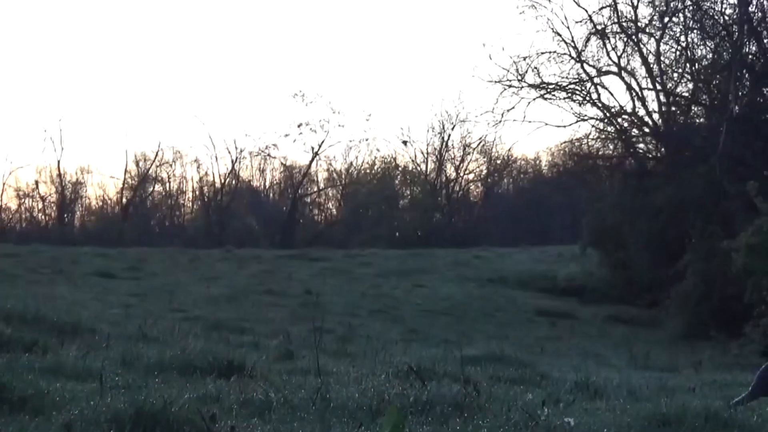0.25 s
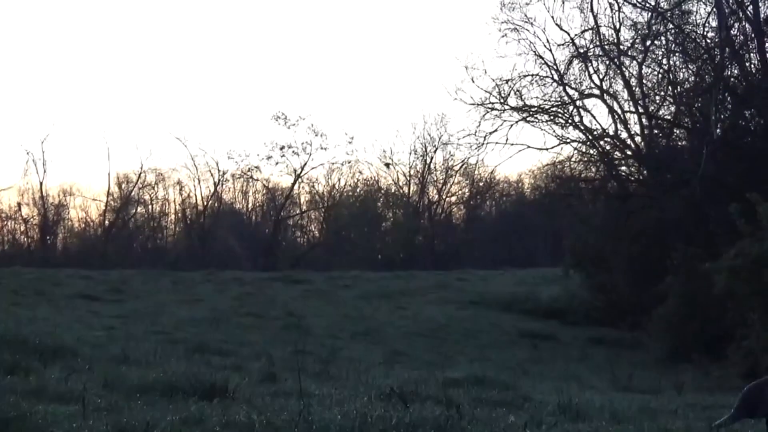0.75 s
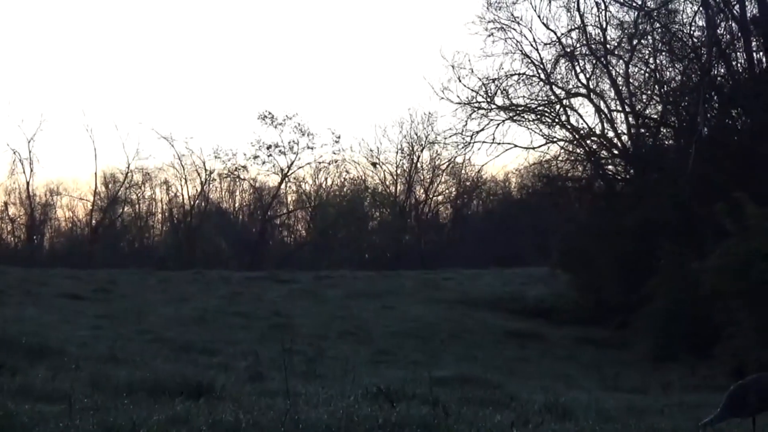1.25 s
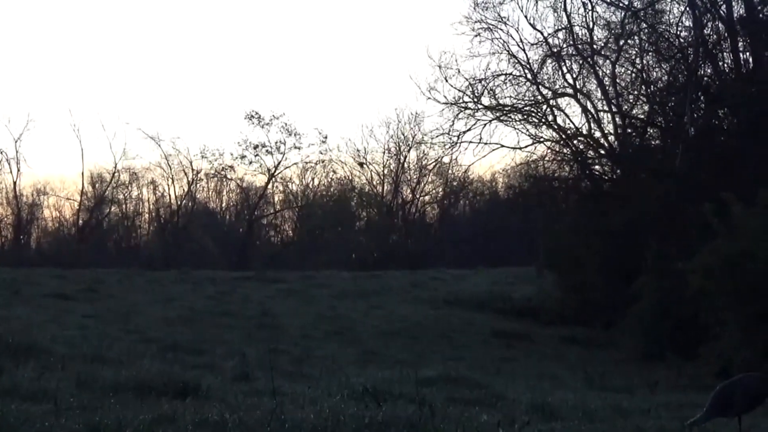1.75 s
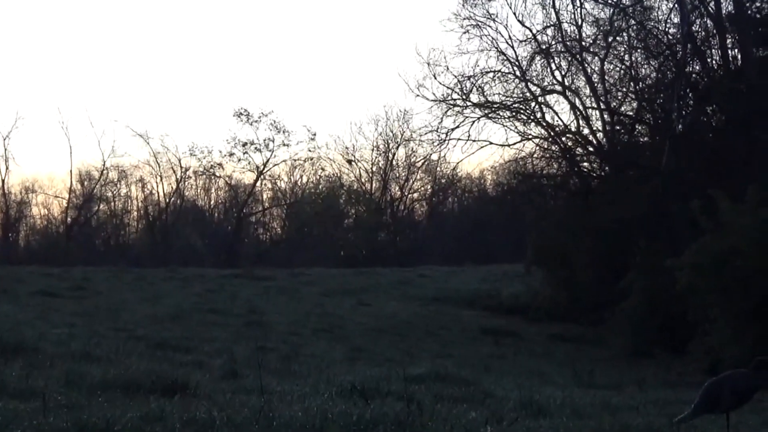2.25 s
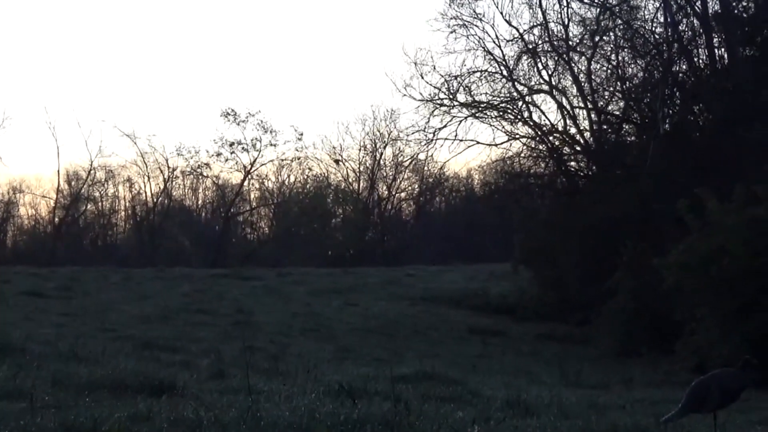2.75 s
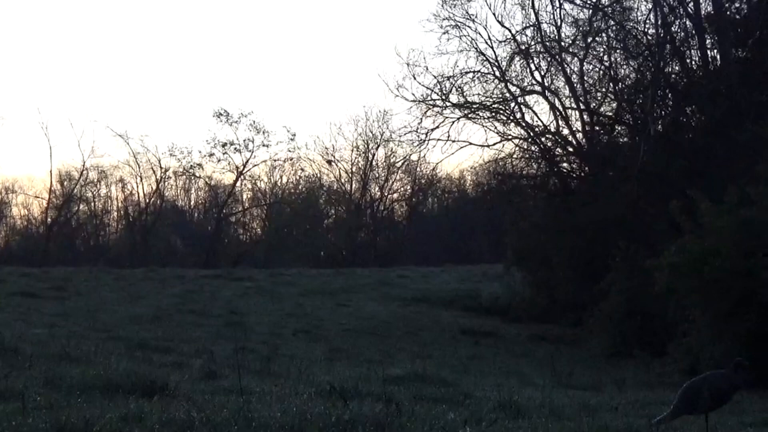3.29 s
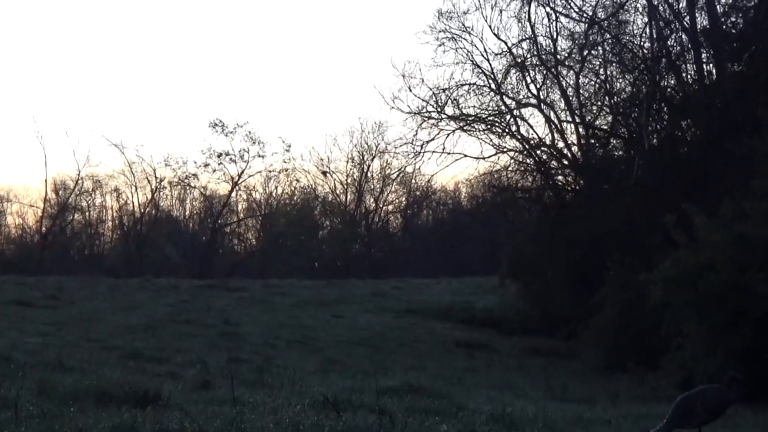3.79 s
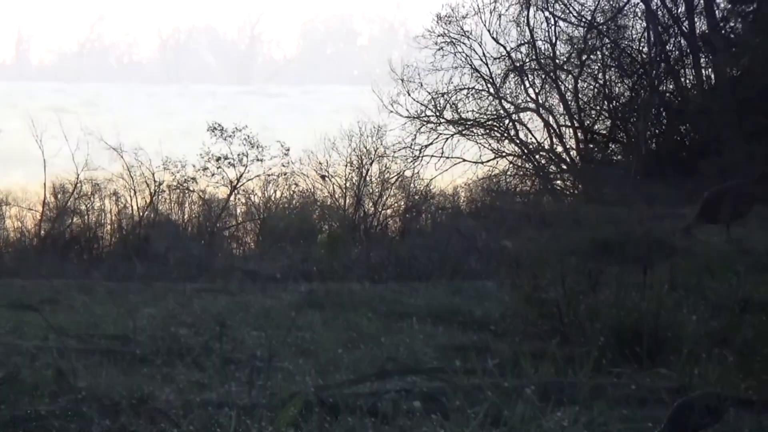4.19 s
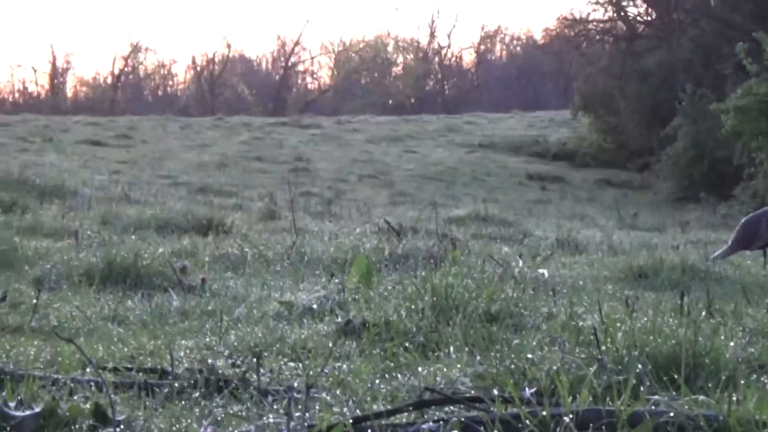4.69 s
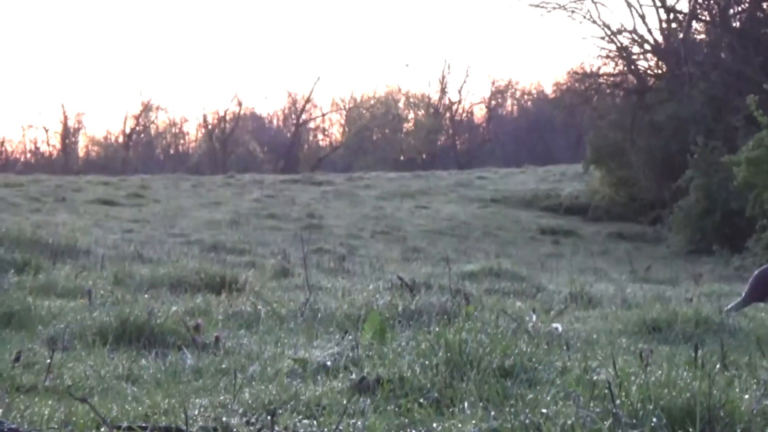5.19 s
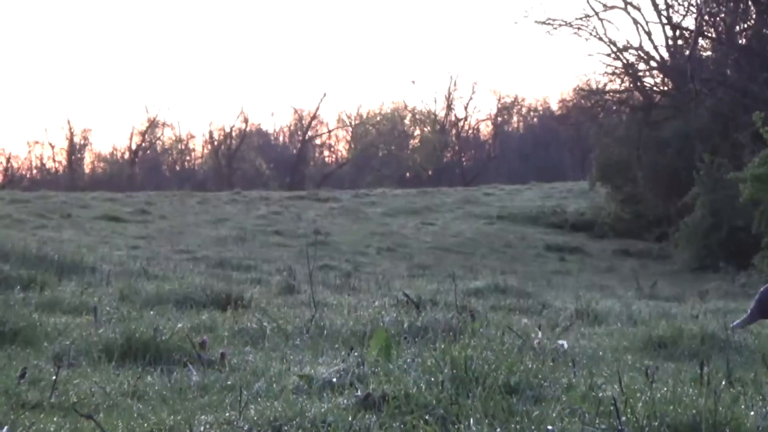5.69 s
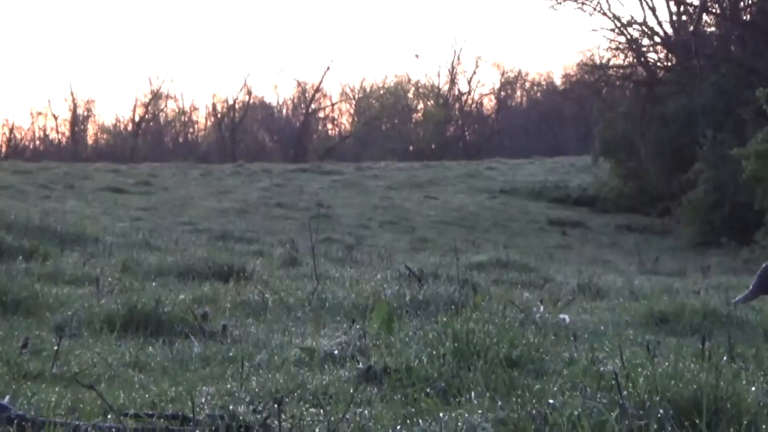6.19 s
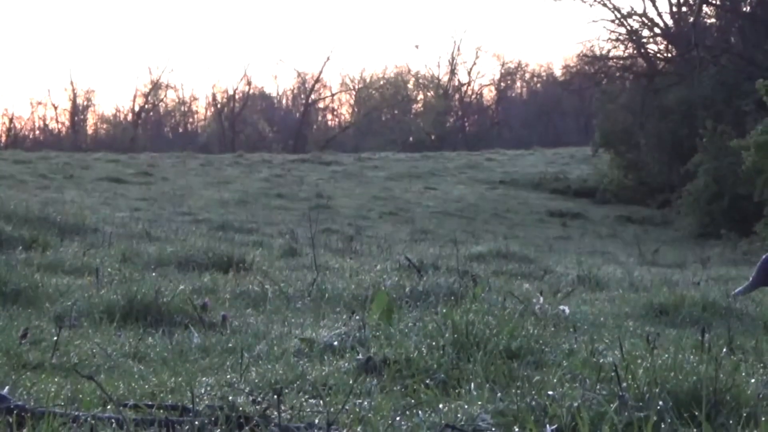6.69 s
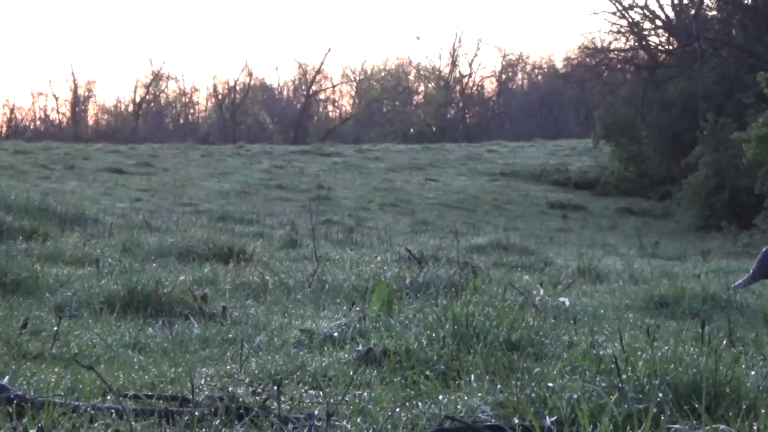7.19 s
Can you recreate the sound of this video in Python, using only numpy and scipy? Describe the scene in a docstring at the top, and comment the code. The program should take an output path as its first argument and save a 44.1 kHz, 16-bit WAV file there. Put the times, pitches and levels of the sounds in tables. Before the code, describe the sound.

Dawn at a pasture's edge: soft distant air, light hiss and a faint far chorus. Nearby songbirds begin with warbled, sliding whistles, and a quick high trill runs from about 0.45 to 0.9 s. Two hard, dry knocks on the camera body jump out at 0.37 and 0.7 s, with a tick at 1.25. At 1.7 s a turkey gobbles far across the field, hoarse falling yelps breaking into a throaty rattle of about half a second, echoing off trees. Whistles continue, with small ticks between 3.2 and 3.8 s and a sharp chip at 3.6. The loudest, crackiest knock hits at 3.9 s. A shorter, weaker gobble follows at 4.4 s with a thin high seep, then another chip at 4.8. A faint low hum lingers. Clearer bird slurs sound from 6 s alongside a soft rustle at 6.2, and a brighter trill closes from 7 s.

```python
"""Gobbles at the edge of a pasture

At dawn a wild turkey gobbles twice from far off: rough tones, then buzzing pulses through throat resonances.
Songbirds whistle, trill and chip on gliding near-pure tones, scattered and echoed by the trees. Three knocks
ring the modes of a hand-held camera's body; light ticks and rustles are bursts of filtered noise. Distant air,
a faint low hum, a far chorus and microphone hiss lie underneath."""
import sys
import numpy as np
from scipy import signal
from scipy.fft import rfft, irfft, next_fast_len
from scipy.io import wavfile
from scipy.ndimage import map_coordinates

SR = 44100
rng = np.random.default_rng(int(sys.argv[2]) if len(sys.argv) > 2 else 0)


def transcribe(signal):
    """Save signal, clipped to [-1, 1], as a 16-bit WAV file at the path in sys.argv[1]."""
    frames = np.atleast_2d(signal).T
    limited = np.clip(frames, -1, 1)
    pcm = np.round(limited * 32767).astype(np.int16)
    wavfile.write(sys.argv[1], SR, pcm)


N = 328545
T = np.arange(N) / SR  # s
LEFT_RIGHT = np.array([[1], [-1]])  # signs that spread a side signal over the two channels


def undb(db):
    """Decibels to gain."""
    return 10 ** (np.asarray(db) / 20)


def unit(x):
    """Scale to rms 1."""
    return x / np.sqrt(np.mean(x ** 2))


def decay(t, t60_s):
    """Exponential fade that loses 60 dB in t60_s."""
    return np.exp(-np.log(1000) * t / t60_s)


def panned(x, pan_db):
    """Place a sound between left and right; pan_db is left minus right."""
    return undb(pan_db * LEFT_RIGHT / 2) * x


def add(out, start_s, x):
    """Mix x into out from start_s on."""
    i = max(int(start_s * SR), 0)
    out[..., i:i + x.shape[-1]] += x[..., :max(N - i, 0)]


def band(x, hz, width_hz):
    """One resonance, gain 1 at its centre."""
    return signal.lfilter(*signal.iirpeak(min(hz, SR * .45), hz / width_hz, fs=SR), x)


def band_twice(x, hz, width_hz):
    """The same resonance in series with itself, for steeper skirts."""
    return band(band(x, hz, width_hz), hz, width_hz)


def walk(rate_hz, size=N):
    """Smooth chance with a spread near 1: random knots at rate_hz, joined by straight lines."""
    knots = rng.standard_normal(int(size / SR * rate_hz) + 4)
    return map_coordinates(knots, [1 + np.arange(size) * rate_hz / SR], order=1) * 1.2


def noise(spectrum):
    """Noise of rms 1 shaped by a spectrum of (pitch_hz, level_db) points."""
    hz, db = np.transpose(spectrum)
    size = next_fast_len(N)
    log_hz = np.log(np.fft.rfftfreq(size, 1 / SR) + 1)
    gain = undb(np.interp(log_hz, np.log(hz), db, left=-120, right=-120))
    return unit(irfft(rfft(rng.standard_normal(size)) * gain, size)[:N])


def arch(length_s):
    """Progress 0-1 through a note, and its rounded loudness."""
    progress = np.linspace(0, 1, max(int(length_s * SR), 32))
    return progress, np.abs(np.sin(np.pi * progress)) ** 0.51


def bend(length_s, start_hz, middle_hz, end_hz):
    """A pitch contour that curves through three pitches."""
    curve = np.polyfit([0, .5, 1], [start_hz, middle_hz, end_hz], 2)
    return np.polyval(curve, arch(length_s)[0])


def glide(length_s, start_hz, end_hz, settle):
    """A pitch contour that moves fast at first and levels off over `settle` time constants."""
    moved = np.expm1(-settle * arch(length_s)[0]) / np.expm1(-settle)
    return start_hz + (end_hz - start_hz) * moved


def tone(hz, waver, flutter_db):
    """A nearly pure note on a pitch contour, wavering in pitch and level."""
    swell = np.sin(np.linspace(0, np.pi, len(hz))).clip(0) ** 0.38
    phase = 2 * np.pi * np.cumsum(hz * (1 + waver * walk(254, len(hz)))) / SR
    wave = np.sin(phase) + undb(-30) * np.sin(2 * phase)  # a trace of second harmonic
    return np.sqrt(2) * swell * undb(flutter_db * walk(119.6, len(hz))) * wave


def whistle(length_s, start_hz, middle_hz, end_hz, waver=0.0048, flutter_db=4.0):
    """A nearly pure tone that bends through three pitches."""
    return tone(bend(length_s, start_hz, middle_hz, end_hz), waver, flutter_db)


def woods(x, direct_db, early_db, late_db, early_t60_s=0.22, late_t60_s=0.62, spread=0.52):
    """Near trunks scatter a short smear; the tree line returns a long soft tail."""
    t = T[:SR]
    early = decay(t, early_t60_s) * (t > .003)
    late = decay(t, late_t60_s) * (1 - np.exp(-t / 0.0063))
    smear = undb(early_db) * unit(early) * rng.standard_normal((2, SR))
    tail = undb(late_db) * unit(late) * rng.standard_normal((2, SR))
    mid, side = (smear + tail) / np.sqrt(SR)
    echo = (mid + spread * LEFT_RIGHT * side) / np.hypot(1, spread)
    return undb(direct_db) * x + signal.fftconvolve(x, echo, axes=1)[:, :N]


def throat(source):
    """The turkey's throat resonances, each applied twice for dark valleys; rms 1."""
    # resonances: pitch_hz, width_hz of one pass, relative level_db
    resonances = [(565, 55, 8.5), (1096, 80, 0), (1325, 105, 2.5), (1680, 470, -1), (2180, 250, -1)]
    return unit(sum(undb(db) * band_twice(source, hz, width_hz) for hz, width_hz, db in resonances))


def yelp(length_s, pitch_hz, rough=0.044, rasp_db=-11):
    """One hoarse note, slightly falling, with throat-coloured breath; rms 1 before its swell."""
    progress, swell = arch(length_s)
    size = len(progress)
    fall = 0.05 * (.5 - progress)
    phase = 2 * np.pi * np.cumsum(pitch_hz * (1 + fall + rough * walk(700, size))) / SR
    # the membrane also flaps at a third of the main pitch, which adds sidebands and chops the rush of air
    flap = np.sin(phase / 3)
    rasp = throat(np.diff(rng.standard_normal(size) * (1 + flap), prepend=0))
    voice = np.sin(phase) * (1 + 0.23 * flap) + undb(rasp_db) * rasp
    return unit(voice * undb(3.2 * walk(344, size))) * swell


def rattle(length_s, beat_hz=19, buzz_hz=340):
    """Buzz and breath, chopped into uneven beats and rung through the throat."""
    progress, swell = arch(length_s)
    size = len(progress)
    cycles = np.cumsum(buzz_hz * (1 + 0.0633 * walk(150, size))) / SR
    clicks = np.diff(np.floor(cycles), prepend=0)  # one per buzz cycle
    source = unit(clicks) + .5 * rng.standard_normal(size)
    beats = np.sin(np.pi * np.cumsum(beat_hz * (1 + 0.13 * walk(15.6, size))) / SR) ** 4
    return throat(source * beats) * np.sqrt(swell)


def turkey():
    """Hoarse falling yelps, then a rattle of buzzing pulses through the throat, far across the field."""
    # gobbles: start_s, yelp level_db, rattle delay_s, rattle length_s, rattle level_db
    gobbles = [(1.67, -36, .092, .55, -52.5), (4.356, -45, .146, 0.34, -52)]
    # the notes of one gobble: delay_s, length_s, main pitch_hz, level_db relative to the gobble's yelp level
    gobble_notes = [(0, 0.063, 1687, -2), (0.047, 0.023, 1378, 1.5), (0.066, 0.023, 1045, -5),
                    (0.085, .036, 2185, -6), (.138, .026, 1050, -8), (.205, 0.035, 1065, -8),
                    (.422, 0.044, 1025, -8.5)]
    out = np.zeros(N)
    for start_s, yelp_db, rattle_delay_s, rattle_length_s, rattle_db in gobbles:
        for delay_s, length_s, hz, db in gobble_notes:
            add(out, start_s + delay_s, yelp(length_s, hz) * undb(yelp_db + db))
        add(out, start_s + rattle_delay_s, rattle(rattle_length_s) * undb(rattle_db))
    return woods(panned(out, -2), direct_db=-2.0, early_db=-8.5, late_db=-13.5, late_t60_s=2.1)


def songbirds(near_db=-27, far_db=-46.5):
    """Carolled whistles from several perches; the loud ones come from close by and carry less echo."""
    near, far = np.zeros((2, 2, N))
    for start_s, hz, db, growth_db, pan_db in bird_notes():
        # 0 at near_db or louder, 1 at far_db or fainter
        distance = np.clip((near_db - db) / (near_db - far_db), 0, 1)
        # far notes arrive through more branches, so they flutter more
        note = tone(hz, waver=.004 + .007 * distance ** 4, flutter_db=2 + 1.4 * distance)
        growth = growth_db * np.linspace(-.5, .5, len(hz))
        note = panned(note * undb(db + growth), pan_db)
        add(near, start_s, (1 - distance) * note)
        add(far, start_s, distance * note)
    near = woods(near, direct_db=-.5, early_db=-11, late_db=-14, early_t60_s=.16)
    far = woods(far, direct_db=-1.2, early_db=-7.5, late_db=-8, early_t60_s=.16, late_t60_s=.8)
    return near + far


def bird_notes():
    """Every sung note as (start_s, pitch contour in Hz, level_db, growth_db, pan_db)."""
    # a warbled phrase: delay_s, length_s, start_hz, middle_hz, end_hz, level_db relative to the phrase
    warble = [(0, .036, 2590, 2630, 2660, -2.5), (.031, .03, 3090, 3090, 3020, -9.5),
              (.062, .07, 2370, 2270, 2300, -7), (.153, 0.047, 2230, 2470, 2720, -1)]
    # level_db of each phrase
    warble_levels = [-53, -43, -41.5, -44]
    for k, phrase_db in enumerate(warble_levels):
        for delay_s, length_s, start_hz, middle_hz, end_hz, db in warble:
            start_s = -.091 + k * .405 + delay_s  # a phrase every .405 s
            if start_s > 0:
                yield start_s, bend(length_s, start_hz, middle_hz, end_hz), phrase_db + db, 0, -9
    # falling slurs, steep at first, growing louder: start_s, length_s, start_hz, end_hz, level_db, pan_db
    slurs = [(0.502, .06, 2160, 1824, -50, -6), (0.757, 0.044, 3750, 3450, -53, -2),
             (0.844, 0.042, 2920, 2480, -45, -8), (.932, 0.061, 2130, 1945, -44, -5),
             (1.312, 0.082, 3890, 3360, -50, -5), (1.518, 0.064, 2134, 1970, -44.5, -4),
             (1.855, 0.083, 3600, 2820, -47.5, -7), (2.111, 0.031, 3020, 2853, -43, -6),
             (2.52, 0.11, 3325, 2186, -49, -4), (2.937, 0.078, 2850, 2380, -49.5, -5),
             (3.118, 0.081, 3780, 3070, -47, -6), (3.223, .045, 2790, 2340, -48, -2),
             (3.348, 0.12, 3440, 2330, -53, 5), (4.2, 0.043, 3045, 2933, -45.5, -4),
             (4.49, .07, 3400, 2910, -52, 7), (4.71, 0.058, 3300, 3150, -54.5, 4),
             (5.44, 0.038, 3200, 2750, -51, -8), (5.481, 0.048, 3260, 2700, -47, -3),
             (6.004, 0.083, 2600, 1754, -39.5, -8.5), (6.067, 0.048, 3130, 2740, -47.5, -5),
             (6.133, 0.05, 3370, 2730, -47.5, -11), (6.403, .148, 3320, 2740, -39.5, -10.5),
             (6.584, 0.039, 3430, 2870, -51, -2), (6.655, 0.091, 2740, 1682, -42.5, -8.5),
             (7.223, 0.051, 2446, 2060, -56, -5)]
    for start_s, length_s, start_hz, end_hz, db, pan_db in slurs:
        yield start_s, glide(length_s, start_hz, end_hz, settle=2.1), db, 5.5, pan_db
    # rising slurs: start_s, length_s, start_hz, end_hz, level_db
    rises = [(1.399, 0.063, 2300, 3080, -43), (3.195, .055, 2450, 3150, -46),
             (6.027, 0.0426, 2580, 2930, -47.5)]
    for start_s, length_s, start_hz, end_hz, db in rises:
        yield start_s, np.geomspace(start_hz, end_hz, int(length_s * SR)), db, 0, -6
    # notes that rise to a top and drop back: start_s, length_s, top_hz, level_db
    arches = [(1.39, 0.047, 3000, -47), (1.527, .07, 3234, -43.5), (1.928, 0.054, 3010, -44),
              (1.993, 0.04, 3165, -42.5), (2.702, .13, 1860, -49.5), (3.443, .097, 1846, -45.5),
              (6.544, 0.058, 3240, -50), (6.719, 0.046, 2500, -44.5), (7.164, .08, 2526, -44),
              (7.285, .06, 2536, -49)]
    for start_s, length_s, top_hz, db in arches:
        yield start_s, bend(length_s, top_hz * .85, top_hz, top_hz * .92), db, 0, -6.5
    # level whistles: start_s, length_s, pitch_hz, level_db
    held = [(2.569, 0.11, 2230, -51.5), (3.457, 0.13, 3540, -55), (6.223, 0.133, 2326, -46),
            (6.75, .1, 4380, -60)]
    for start_s, length_s, hz, db in held:
        yield start_s, bend(length_s, hz, hz, hz), db, 0, -4.5
    # upsweeps that end on a softer held top: start_s, level_db, pan_db
    upsweeps = [(2.069, -43, -4.5), (6.655, -46.5, 4)]
    # pitches of one upsweep: start_hz, middle_hz, end_hz
    upsweep_pitches = (3330, 3643, 4100)
    sweep_s, top_hz, top_db = .095, 4065, -11  # top_db is relative to the sweep
    for start_s, db, pan_db in upsweeps:
        sweep = bend(sweep_s, *upsweep_pitches)
        yield start_s, sweep, db, 0, pan_db
        yield start_s + .9 * sweep_s, np.full(len(sweep), top_hz), db + top_db, 0, pan_db


def trill(count=5, period_s=.095, slur_lead_s=.026, rise_s=.07, rise_from_hz=3600, top_hz=4863):
    """Each syllable slurs down, then sweeps up and swells into a held top."""
    # bouts: start_s, held top level_db, slur level_db
    bouts = [(.447, -56, -64), (7.047, -50.5, -53)]
    out = np.zeros((2, N))
    for bout_s, top_db, slur_db in bouts:
        for start_s in bout_s + period_s * np.arange(count):
            slur = whistle(0.035, 3900, 3300, 2948, waver=0.014)
            add(out, start_s - slur_lead_s, slur * undb(slur_db))
            hz = glide(rise_s, rise_from_hz, top_hz, settle=8.5)
            # the level reaches that of the top only as the pitch does
            arrived = ((hz - rise_from_hz) / (top_hz - rise_from_hz)) ** 8
            level_db = slur_db + (top_db - slur_db) * arrived
            add(out, start_s, tone(hz, waver=.002, flutter_db=2) * undb(level_db))
    return woods(out, direct_db=0, early_db=-11, late_db=-11)


def seeps():
    """Thin high wavering calls of a small bird."""
    # calls: start_s, length_s, start_hz, middle_hz, end_hz, level_db before the woods
    seep_calls = [(4.376, 0.15, 7850, 7630, 8040, -59.5), (4.65, 0.037, 6200, 6440, 6650, -56.5)]
    out = np.zeros((2, N))
    for start_s, length_s, start_hz, middle_hz, end_hz, db in seep_calls:
        add(out, start_s, whistle(length_s, start_hz, middle_hz, end_hz, waver=0.0114) * undb(db))
    return woods(out, direct_db=-1.5, early_db=-7, late_db=-13)


def chips(length_s=.022, waver=.05):
    """Sharp calls: very fast downward sweeps, smeared by the branches."""
    # calls: start_s, level_db before the woods
    chip_calls = [(3.568, -37.5), (4.819, -37.5)]
    out = np.zeros((2, N))
    for start_s, db in chip_calls:
        chip = whistle(length_s, 10500, 6900, 5250, waver=waver)
        add(out, start_s, panned(chip * undb(db), -1.5))
    return woods(out, direct_db=-6, early_db=-1.5, late_db=-14, early_t60_s=0.13)


def knocks(rise_s=0.0015, crack_t60_s=0.013, crack_width=0.61, port_skew=0.65, panel_hz=770):
    """Each knock rings the camera body for a few milliseconds, with a brief crack on top."""
    # blows: start_s, level_db, tilt_db per octave, lowest_hz (modes below it are weak),
    # panel_db (side panel's boost or cut), grip (pitch factor), relative crack_db
    blows = [(0.3651, -3, 1, 345, -14, 1.017, -13), (0.7117, -5, 2.6, 131.3, -0.5, 0.98, -8),
             (3.9198, 0, 3, 141, -5, 1, -3.5)]
    # body modes: pitch_hz before the grip factor, t60_s, relative level_db, pan_db
    body_modes = [(176, 0.078, -23.5, 0), (258.3, 0.036, -19.5, 8.5), (428.6, 0.028, -13.5, 8.5),
                  (705, 0.03, -9.5, -5), (837, 0.024, -4.5, -10), (1096, 0.021, -8, 0),
                  (1399, 0.023, -7.5, 0.5), (1743, 0.013, 2.5, -4), (2170, 0.026, -11.5, 2),
                  (2410, 0.02, -11, 1), (2810, 0.015, -13, 7), (3250, 0.0088, -12, 0),
                  (3580, 0.019, -16.5, -2), (4380, 0.0069, -7.5, 0), (5095, 0.014, -25, -3),
                  (6000, 0.0077, -15, -5), (7050, 0.0064, -28, 11), (7400, 0.0056, -36, 3)]
    out, t = np.zeros((2, N)), T[:SR // 8]
    build = 1 - np.exp(-t / rise_s)
    for start_s, db, tilt_db, lowest_hz, panel_db, grip, crack_db in blows:
        ring = 0
        for k, (hz, t60_s, mode_db, pan_db) in enumerate(body_modes):
            # hardness tilts the modes; the place of the blow decides how much the side panel rings
            panel_share = np.exp(-(np.log2(hz / panel_hz) / 0.21) ** 2)
            blow_db = tilt_db * np.log2(hz / 1500) + panel_db * panel_share
            gain = undb(mode_db + blow_db) / np.hypot(1, (lowest_hz / hz) ** 4)
            # each mode reaches the two capsules a little out of step
            skew = port_skew * LEFT_RIGHT * np.cos(k)
            wave = np.sin(2 * np.pi * hz * grip * t + k * np.pi + skew)
            ring = ring + panned(gain * wave * decay(t, t60_s), pan_db)
        mid, side = band_twice(rng.standard_normal((2, len(t))), 3200, 3200)
        crack = unit(mid + crack_width * LEFT_RIGHT * side) * decay(t, crack_t60_s)
        add(out, start_s, undb(db) * build * (ring + undb(crack_db) * crack))
    return woods(out, direct_db=1.5, early_db=-36, late_db=-29.5)


def ticks(bright_t60_s=0.0075, dull_t60_s=0.012):
    """Tiny dry ticks of bright decaying noise, some with a little duller body under them."""
    # ticks: start_s, level_db before halving, body_db relative to the bright snap
    tick_times = [(0.2452, -33, -18), (1.252, -25, -14), (2.307, -32, -36), (3.1597, -28, -18),
                  (3.272, -37, -12), (3.465, -24, -24), (3.552, -36, -18), (3.7518, -33, -28),
                  (3.837, -28.5, 6), (4.129, -35.5, 4.5), (4.488, -42.5, 12), (5.2067, -31, -5),
                  (6.412, -34, -2)]
    out, t = np.zeros(N), T[:SR // 30]
    for start_s, db, body_db in tick_times:
        snap, body = rng.standard_normal((2, len(t)))
        snap = unit(band_twice(snap, 7700, 5000)) * decay(t, bright_t60_s)
        body = unit(band_twice(body, 1100, 1100)) * decay(t, dull_t60_s)
        add(out, start_s, undb(db) * (snap + undb(body_db) * body) / 2)
    return out


def rustles():
    """Short grainy brushes and soft bumps close to the microphone, made of band-filtered noise."""
    # brushes and bumps: start_s, length_s, centre_hz, width_hz of one filter pass, level_db
    brushes = [(1.57, 0.015, 322, 280, -54.5), (1.79, 0.061, 170, 120, -61), (5.114, 0.12, 4120, 3240, -51),
               (6.117, 0.21, 404, 250, -60), (6.19, 0.156, 1300, 1900, -49.5),
               (6.214, 0.15, 7450, 6000, -53.5), (7.054, 0.016, 375, 237.6, -45)]
    out = np.zeros(N)
    for start_s, length_s, hz, width_hz, db in brushes:
        progress, swell = arch(length_s)
        grains = rng.standard_normal(len(progress)) * undb(3 * walk(297, len(progress)))
        add(out, start_s, unit(band_twice(grains, hz, width_hz)) * swell * undb(db))
    return out


def far_birds(count=240, spread_db=6):
    """Many faint chirps from deep in the woods, heard mostly as echo; rms 1."""
    out = np.zeros((2, N))
    for when, pitch, slope, size in rng.random((count, 4)):
        hz = 2150 + 1550 * pitch
        glide_hz = 700 * (slope - .5)
        chirp = whistle(.045, hz + glide_hz, hz, hz - glide_hz, waver=.02, flutter_db=3)
        add(out, when * N / SR, chirp * undb(spread_db * size))
    return unit(woods(out, direct_db=-6, early_db=-2, late_db=-1))


def bed(spectrum, level_db, side_db, pan_db, flicker_db):
    """A wide noise with a given spectrum that flickers a little in level."""
    mid, side = noise(spectrum), noise(spectrum)
    wide = mid + undb(side_db) * LEFT_RIGHT * side
    return panned(wide, pan_db) * undb(level_db + flicker_db * walk(14))


def hums():
    """Faint hum: low sines that drift in pitch and level and fade in and out; a 216 Hz one comes in at 4.3 s."""
    # hums: start_s, end_s, pitch_hz, level_db
    hum_spans = [(4.33, 7.6, 216, -69.5), (3.3, 6.4, 410, -75), (4.7, 6.3, 86, -76.5),
                 (0.66, 1.8, 108, -73.5)]
    out = np.zeros(N)
    for start_s, end_s, hz, db in hum_spans:
        fade = np.clip(np.minimum(T - start_s, end_s - T) / 0.21, 0, 1)
        level = np.sqrt(2) * fade * undb(db + 0.5 * walk(8.6))
        out += level * np.sin(2 * np.pi * np.cumsum(hz * (1 + 0.00434 * walk(3.1))) / SR)
    return out


def background():
    """Distant air, rumble and hum, the far dawn chorus and the microphone's hiss."""
    # spectra of the noise beds: pitch_hz, relative level_db
    air_spectrum = [(150, -32), (250, -11), (322, -8.5), (351, -7), (407, -7.5), (444, -7.5), (566, -2),
                    (613, -1), (640, -0.5), (782, -1), (890, 1), (1010, -1), (1090, 0), (1280, -5.5),
                    (2000, -9), (2600, -11.5), (4400, -120)]
    hiss_spectrum = [(2240, -14), (3800, -1), (4420, -3.5), (5400, -3.5), (6690, -5), (8330, -5),
                     (9160, -6.5), (10500, -6), (11300, -17.5), (14700, -47), (22000, -120)]
    rumble_spectrum = [(15, -58), (25, -39), (76, -7), (124, -5.5), (156, -4.5), (184, -7), (211, -3.5),
                       (241, -6.5), (300, -13), (390, -48), (660, -120)]
    chorus_spectrum = [(1500, -3.5), (2000, 2), (2500, 5.5), (3000, -4), (3700, -11), (4300, -13),
                       (5000, -26)]
    # slow level curves, offset below for each layer: time_s, level_db
    air_curve = [(0.0, -57), (0.7, -54), (1.24, -55.5), (1.95, -53), (2.59, -57), (3.67, -53), (4.32, -58),
                 (4.79, -51), (5.79, -54.5), (6.56, -52.5), (7.07, -55.5), (7.45, -54)]
    chorus_curve = [(0, -50), (.5, -52), (1.449, -49.5), (2.05, -49.5), (2.35, -52.5), (3.0, -50),
                    (4.15, -53), (4.7, -47.5), (5.3, -52.5), (5.7, -52), (5.95, -56.5), (6.55, -49.5),
                    (7.45, -53.5)]
    air_db = np.interp(T, *np.transpose(air_curve))
    chorus_db = np.interp(T, *np.transpose(chorus_curve))
    out = bed(air_spectrum, air_db + 1.5, side_db=-4.0, pan_db=-1.0, flicker_db=1.43)
    out += bed(hiss_spectrum, -57, side_db=-7.5, pan_db=0.0, flicker_db=0.5)
    out += bed(rumble_spectrum, -69, side_db=-15.5, pan_db=0.0, flicker_db=1.5)
    # the chorus is a noise wash plus single faint chirps
    out += bed(chorus_spectrum, chorus_db - 4.5, side_db=-2.0, pan_db=-1.0, flicker_db=2.55)
    out += panned(far_birds(), -1.5) * undb(chorus_db - 3)
    return out + hums()


def scene():
    """Everything at the microphone."""
    birds = turkey() + songbirds() + trill() + seeps() + chips()
    handling = knocks() + ticks() + rustles()
    return birds + handling + background()


def record(dry, top_hz=11100):
    """Peaks clip just under full scale, then a steep low-pass cuts the top."""
    low_pass = signal.ellip(10, .2, 72, top_hz, fs=SR, output="sos")
    return signal.sosfilt(low_pass, np.clip(dry, -.9, .9))


dry = scene()
out = record(dry)
transcribe(out)
```